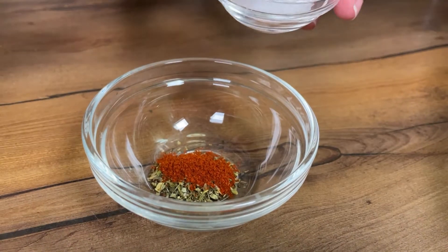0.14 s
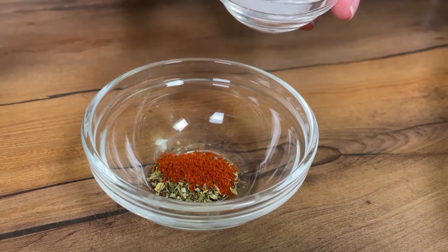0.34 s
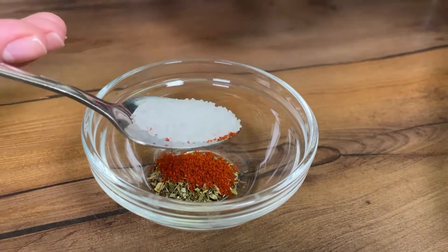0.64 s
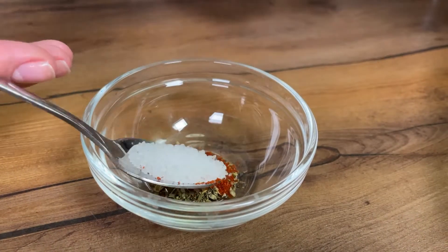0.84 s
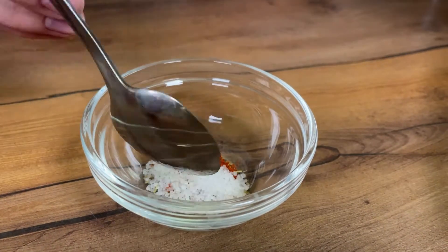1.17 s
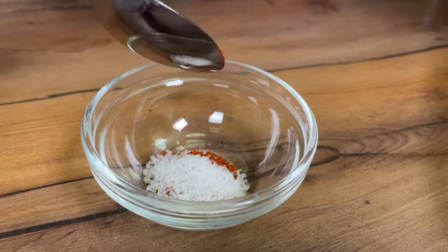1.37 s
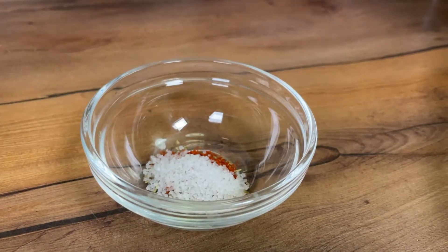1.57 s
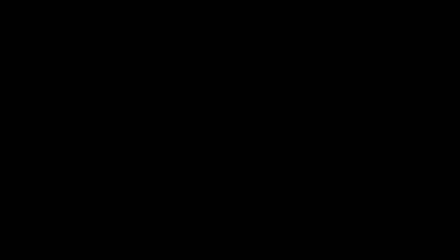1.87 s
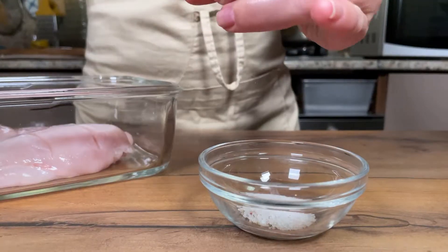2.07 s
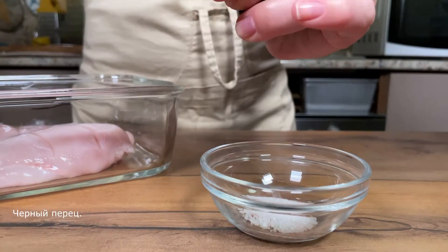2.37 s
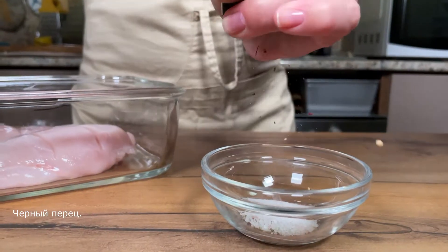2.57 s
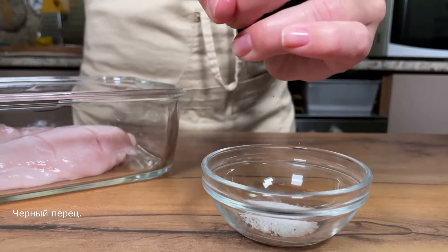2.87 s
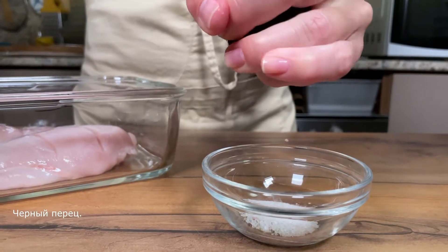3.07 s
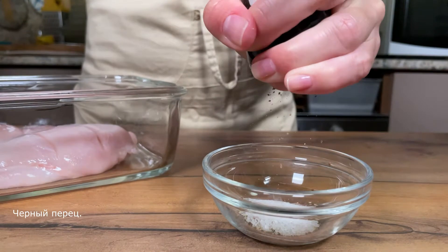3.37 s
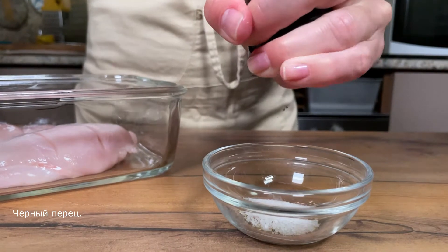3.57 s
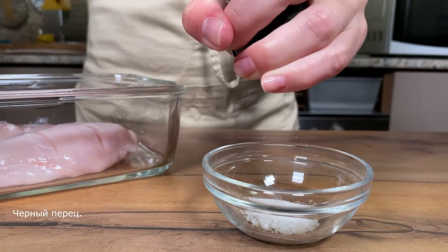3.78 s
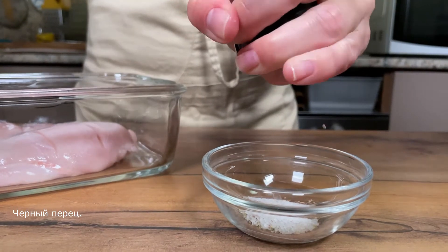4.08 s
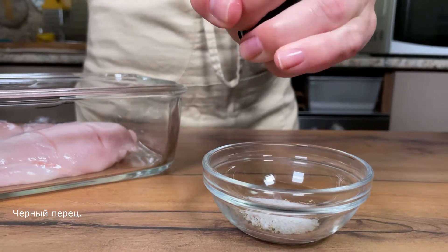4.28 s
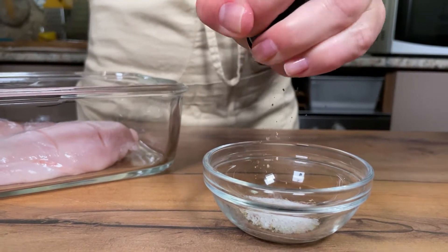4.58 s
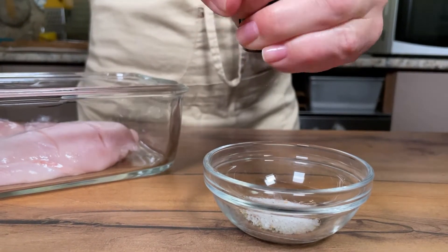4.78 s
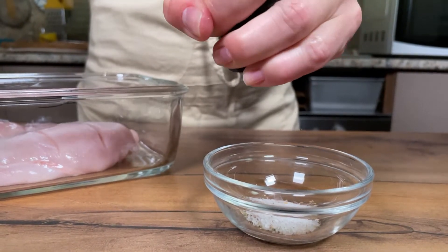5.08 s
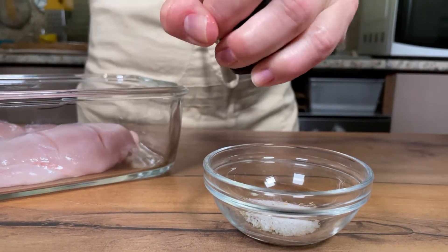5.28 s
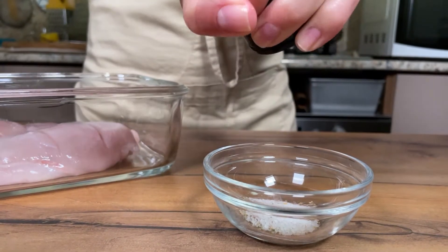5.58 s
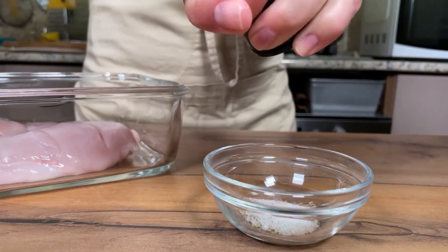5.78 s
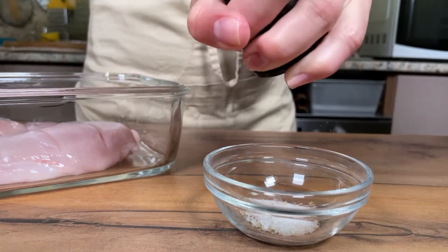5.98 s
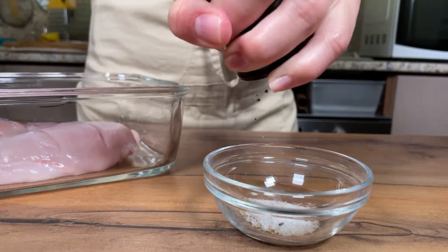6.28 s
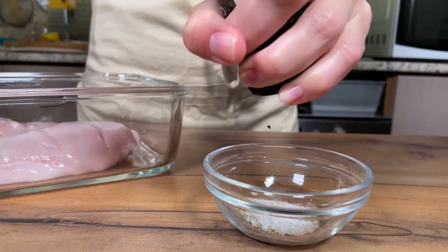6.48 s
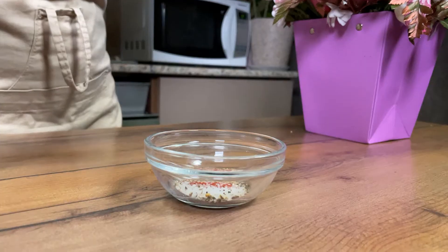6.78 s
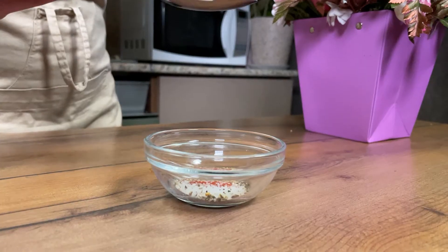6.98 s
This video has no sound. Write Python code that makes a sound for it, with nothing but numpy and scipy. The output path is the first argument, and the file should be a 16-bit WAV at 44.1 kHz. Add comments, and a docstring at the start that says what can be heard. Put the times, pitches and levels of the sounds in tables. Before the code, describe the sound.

A low, soft kitchen rumble with a faint appliance hum opens the scene. At about 0.86 s a spoon touches a small glass bowl with a short bright clink and slight bounce, followed by a duller knock at 0.9 s; coarse salt slides off with a barely audible hiss until about 1.5 s. The sound drops out completely around 1.93-2.0 s. Then a hand pepper mill, close to the microphone, is twisted in runs: 2.4-2.75, 3.04-3.33 (the strongest), 3.7-3.9 and 4.3-4.55 s, each a cluster of dry, sharp cracks with gritty crushing and a short room ring. Faint hand rustles precede the twists. A much weaker turn comes at 4.9-5.2 s, a small knock at 5.4, and tiny crumb ticks on glass at 5.5-5.65. A last crunch at 5.95-6.2 s has a bright crack and ends in a hard knock. After another dropout at 6.55-6.63 s, only rumble and hum remain.

```python
"""A low hum and rumble of a kitchen come first, then a spoon clinks on a small glass bowl and coarse salt hisses out.
Then a hand pepper mill is twisted over the bowl: peppercorns crack in runs, grit is crushed, crumbs tick on the glass.
Breaks and grit are noise bursts and random clicks sent through resonances of the mill; the spoon is ringing sines.
Hands and salt are fine random clicks, coloured. All is heard close to, on one microphone channel;
the hard-walled kitchen rings after mill and bowl, an appliance hums throughout, and the sound drops out briefly twice."""
import sys
import numpy as np
from scipy import signal
from scipy.fft import rfft, irfft, next_fast_len
from scipy.io import wavfile
from scipy.ndimage import uniform_filter1d

SR = 44100
rng = np.random.default_rng(int(sys.argv[2]) if len(sys.argv) > 2 else 0)


def dump_mix(stems):
    """Bounce the given channels to the path in sys.argv[1] as a 16-bit WAV at rate SR."""
    frames = np.atleast_2d(stems).T  # one column per channel
    limited = np.clip(frames, -1, 1)  # hard clip at full scale
    pcm = np.round(limited * 32767).astype(np.int16)
    wavfile.write(sys.argv[1], SR, pcm)


N = 314842
TIME = np.arange(N) / SR

# peppercorns breaking between the burrs: (time [s], crack level [dB], casing knock [dB re crack level])
CRACKS = [(2.381, -11.5, -25.5), (2.386, -8.5, -23.5), (2.394, -8.5, -18), (2.398, -8, -34.5),
          (2.475, -25, -16), (2.495, -20, -21), (2.509, -9, -34), (2.564, -8.5, -29.5), (2.643, -16, -32),
          (2.656, -19.5, -18), (2.747, -38.5, -16), (3.039, -17.5, -26.5), (3.096, -7.5, -26),
          (3.123, -11.5, -24), (3.151, -20.5, -19.5), (3.193, -14.5, -35.5), (3.221, -5.5, -20),
          (3.234, -6, -18.5), (3.279, 0, -25.5), (3.284, -6.5, -22), (3.298, -6, -22.5),
          (3.31, -16.5, -17.5), (3.331, -14, -10.5), (3.686, -10, -33), (3.699, -5, -42.5),
          (3.755, -7, -27), (3.763, -6.5, -22), (3.796, -10, -26.5), (3.838, -17.5, -25.5),
          (3.856, -12, -30), (3.877, -10.5, -41), (4.277, -24.5, -25), (4.305, -23.5, -22.5),
          (4.322, -14, -25), (4.334, -7.5, -23.5), (4.346, -6, -29), (4.363, -12, -25.5),
          (4.381, -11, -26.5), (4.444, -11, -30), (4.461, -8.5, -14.5), (4.484, -12, -24),
          (4.507, -10, -28), (4.545, -30.5, -19.5), (4.905, -31.5, -22), (4.916, -27, -27),
          (4.99, -15, -29), (5.12, -39, -37), (5.176, -25.5, -32.5), (5.952, -29, -16),
          (5.991, -3.5, -23.5), (6.008, -5, -26.5), (6.081, -12.5, -27.5), (6.214, -12.5, -10)]
# the pieces of a broken corn splinter in turn: least gap, and the mean of the random delay on top of it
SPLINTER_WAIT_S, SPLINTER_MEAN_DELAY_S = 0.003, 0.007
# the first is much weaker than the crack, the others fall off steadily, with a random scatter
SPLINTER_FIRST_DB, SPLINTER_LOSS_DB, SPLINTER_SCATTER_DB = -11, 6, 3
SPLINTER_CASING_DB = -25.5   # casing knock re splinter level


def breakages(count):
    """Every corn's crack and the `count` splinters after it: (time [s], level [dB], casing [dB re level])."""
    rows = []
    for s, crack_db, casing_db in CRACKS:
        rows.append((s, crack_db, casing_db))
        gaps = SPLINTER_WAIT_S + SPLINTER_MEAN_DELAY_S * rng.exponential(size=count)
        times = s + np.cumsum(gaps)
        levels = crack_db + SPLINTER_FIRST_DB - SPLINTER_LOSS_DB * np.arange(count)
        levels = levels + SPLINTER_SCATTER_DB * rng.standard_normal(count)
        rows += [(t, db, SPLINTER_CASING_DB) for t, db in zip(times, levels)]
    return rows


# resonances of the burrs, the casing and the sharp edge: (frequency [Hz], width [Hz], gain [dB])
BURR_MODES = [(2840, 940, -14.5), (4200, 900, -8), (5365, 450, -3), (5915, 260, -2), (7810, 690, 0.5),
              (9600, 620, -14)]
CASING_MODES = [(228, 99, -16), (838.6, 410, -2), (1174, 563, 3), (1585, 594, 2.5)]
EDGE_MODES = [(10960, 2200, -4), (13600, 700, -1.5), (14900, 1400, -0.5)]
# each twist is held differently and colours all its breaks:
# (start [s], added gain of the lowest burr mode [dB], mean sharp edge [dB re break level])
TWISTS = [(2.3, 3, -19.5), (3.0, 5.5, -19), (3.6, 0.5, -16.5), (4.2, -5, -20), (4.8, 3, -13.5),
          (5.9, -8, -22.5)]
BURR_DB, EDGE_SCATTER_DB = -12, 6   # burr ring, rms re break level; random spread of the edge


def peppercorns():
    """Each break rings the burrs, knocks the casing and has a sharp edge, coloured by the twist it belongs to."""
    s, level_db, casing_db = np.transpose(breakages(count=4))
    twists = np.array(TWISTS)
    _, lowest_mode_db, edge_db = twists[np.searchsorted(twists[:, 0], s) - 1].T
    breaks = fractures(len(s), snap_s=0.00029, crumble_s=0.002, crumble_db=-9.0)
    # where a corn sits between the teeth decides how hard each burr mode is struck
    shares_db = 3 * rng.standard_normal((len(s), len(BURR_MODES), 1))
    shares_db[:, 0, 0] += lowest_mode_db
    struck = [(hz, width, db + shares_db[:, k]) for k, (hz, width, db) in enumerate(BURR_MODES)]
    edge_db = edge_db + EDGE_SCATTER_DB * rng.standard_normal(len(s))
    burr = at_level(high_pass(resonate(breaks, struck), hz=2360), level_db + BURR_DB)
    casing = at_level(low_pass(resonate(breaks, CASING_MODES), hz=2730), level_db + casing_db)
    edge = at_level(high_pass(resonate(breaks, EDGE_MODES), hz=9000), level_db + edge_db)
    return place(s, burr + casing + edge)


def grit(linger_s, strain_s, strain_db, burr_db, casing_db, edge_db, rumble_db):
    """A corn creaks under strain before it breaks, then its fragments are crushed and the load shudders the mill."""
    s, level_db = np.transpose(CRACKS)[:2]
    energy = place(s, from_db(level_db)[:, None] ** 2)
    # run backwards in time, so that the strain builds up towards each crack
    strain = linger(energy[::-1], strain_s)[::-1]
    load = np.sqrt(linger(energy, linger_s)) + from_db(strain_db) * np.sqrt(strain)
    crush = grains(per_s=940, spread_db=4.5)
    sound = from_db(rumble_db) * rms_one(resonate(crush, [(110, 280, 0)]))   # the shudder
    for modes, db in ((BURR_MODES, burr_db), (CASING_MODES, casing_db), (EDGE_MODES, edge_db)):
        sound = sound + from_db(db) * rms_one(resonate(crush, modes))
    return load * sound


# crumbs landing in the bowl: (time [s], peak level [dB])
CRUMBS = [(4.169, -42), (5.4812, -41.5), (5.5702, -48.5), (5.6027, -36.5), (5.622, -37), (5.6266, -42),
          (5.6374, -43.5)]
# resonances of their ticks: (frequency [Hz], width [Hz], relative gain [dB])
CRUMB_MODES = [(5260, 900, -36.5), (8500, 1900, 22), (10300, 1500, -9), (14700, 6500, -15.5)]


def crumbs():
    """Light crumbs tick on the glass: short noise bursts through broad resonances."""
    s, peak_db = np.transpose(CRUMBS)
    bursts = fractures(len(s), snap_s=0.00012, crumble_s=0.0023, crumble_db=-9)
    ticks = resonate(bursts, CRUMB_MODES)
    heights = from_db(peak_db) / np.abs(ticks).max(axis=1)
    return place(s, ticks * heights[:, None])


# touches of the spoon on the glass: (time [s], level [dB])
CLINKS = [(0.8566, -26.5), (0.8580, -37.5), (0.8708, -37.5)]
# ringing modes of the clink: (frequency [Hz], level [dB re touch], decay t60 [s])
SPOON_MODES = [(2153, -31.5, 0.8), (2134, 0, 0.029), (2230, -11.5, 0.018), (2380, 1.5, 0.017),
               (3300, -20, 0.04), (5230, -29, 0.27), (5140, -3.5, 0.057), (5800, -22, 0.051),
               (8770, -13.5, 0.029), (13800, -19, 0.046)]


def spoon(tick_db):
    """The spoon strikes the glass and bounces; salt caught between them gives each touch a gritty tick."""
    s, db = np.transpose(CLINKS)
    touches = place(s, from_db(db)[:, None])
    rings = sum(from_db(level_db) * ring(touches, hz, t60) for hz, level_db, t60 in SPOON_MODES)
    crushed_salt = fractures(len(s), snap_s=0.00048, crumble_s=0.0017, crumble_db=-6)
    ticks = at_level(resonate(crushed_salt, [(2470, 720, -1.5), (6170, 710, -2)]), db + tick_db)
    return high_pass(rings + place(s, ticks), hz=1610)


# knocks of the utensils and of the mill's body in the hand, and the bright 3.9 kHz ring of the crack at 6.01 s:
# (time [s], pitch [Hz], level [dB], decay t60 [s])
KNOCKS_AND_RING = [(0.857, 587, -46.5, 0.42), (0.8982, 556, -32.5, 0.17), (0.8995, 621, -41, 0.21),
                   (0.898, 327, -42, 0.049), (0.894, 1006, -51, 0.12), (2.387, 95, -36.5, 0.027),
                   (3.227, 86.5, -31, 0.053), (5.411, 500, -43, 0.017), (5.416, 127.6, -46, 0.079),
                   (6.0101, 3930, -12, 0.008), (6.2150, 1145, -5, 0.0051)]


def knocks_and_crack_ring(rough, rattle_hz):
    """Each knock, and the ring of one crack, is a decaying sine with a soft onset, roughened by slow noise."""
    s, hz, db, t60 = np.transpose(KNOCKS_AND_RING)[:, :, None]
    t = np.arange(SR // 2) / SR
    noise = rng.standard_normal((len(s), len(t)))
    rattle = 1 + rough * rms_one(low_pass(noise, hz=rattle_hz))
    build_up = 1 - np.exp(-2 * hz * t)   # time constant of half a cycle
    envelope = t60_decay(t, t60) * build_up
    return place(s.ravel(), from_db(db) * np.sin(2 * np.pi * hz * t) * envelope * rattle)


# salt sliding off the spoon: (time [s], level [dB], brightness [0-1])
SALT = [(0.86, -78, 1), (0.92, -71, 1), (1.05, -72, 0.98), (1.275, -88, 0.02), (1.295, -66, 0),
        (1.34, -65, 0), (1.48, -88, 0)]
# colour of the hiss on the heap and on the steel: (frequency [Hz], width [Hz], relative gain [dB])
SALT_HEAP = [(2780, 690, 13), (4380, 3500, -2)]
SALT_ON_STEEL = [(5600, 980, 3.5), (11020, 330, 7)]


def salt():
    """Crystals, as a stream of random clicks, hiss brightly over the steel and more dully onto the heap."""
    db, bright = in_time(SALT, outside=-np.inf)
    bright = np.clip(bright, 0, 1)
    flow = grains(per_s=2000, spread_db=-0.5)
    on_steel = bright * rms_one(resonate(flow, SALT_ON_STEEL))
    on_heap = (1 - bright) * rms_one(resonate(flow, SALT_HEAP))
    return from_db(db) * (on_steel + on_heap)


# the hand takes a fresh grip before each twist: (time [s], level [dB], swell and fade [s])
GRIPS = [(2.29, -63.5, 0.13), (3.023, -51.5, 0.015), (3.658, -49.5, 0.015), (4.2, -69, .05),
         (4.865, -50.5, 0.011), (5.56, -69, 0.081)]
# spectrum of the rustle: (frequency [Hz], relative level [dB per Hz])
HANDS_COLOUR = [(300, -18.5), (1500, -4.5), (3000, -11.5), (5000, 0.5), (7000, -2), (9000, -3.5),
                (12500, -10), (15000, 1.5)]
# while the mill is in the hands, they never rest entirely
HELD_FROM_S, HELD_TO_S, HELD_DB = 2.0, 6.55, -79


def hands():
    """Skin and loose pepper rustle faintly, swelling and fading with each fresh grip."""
    holding = from_db(HELD_DB) * ((TIME > HELD_FROM_S) & (TIME < HELD_TO_S))
    gripping = sum(from_db(db) * np.exp(-np.abs(TIME - s) / swell_s) for s, db, swell_s in GRIPS)
    rustle = grains(per_s=4000, spread_db=2.5)
    return (holding + gripping) * coloured(rustle, HANDS_COLOUR)


# reverberation of the kitchen: (frequency [Hz], relative level [dB], decay t60 [s])
KITCHEN = [(149, 5, 0.38), (600, -5.5, 0.22), (1460, -7.5, 0.4), (2720, 5.5, 0.35), (4730, -4, 0.41),
           (7600, -8.5, 0.41), (10000, -4.5, 0.35), (11900, -1.5, 0.3), (15500, -6, 0.28)]


def kitchen(x, wet_db, build_s, echo_db, echoes_s, turns_per_s):
    """Early echoes from table and cupboards merge into a dense tail that dies band by band.
    The source turns steadily, throwing its sound along two different sets of paths."""
    t = np.arange(SR * 3 // 4) / SR
    early = rng.standard_normal((2, len(t))) * (rng.random((2, len(t))) < 2500 / SR)
    echoes = from_db(echo_db) * rms_one(early) * np.exp(-t / echoes_s)
    wash = rng.standard_normal((2, len(t))) + echoes
    spectrum, bins = rfft(wash), np.arange(len(t) // 2 + 1) * SR / len(t)
    edges = np.geomspace(60, 20000, 22)
    paths = 0
    for low, high in zip(edges, edges[1:]):
        db, t60 = at_hz(KITCHEN, np.sqrt(low * high))
        band = irfft(spectrum * ((bins >= low) & (bins < high)), len(t))
        tail = band * t60_decay(t, t60) * (1 - np.exp(-t / build_s))
        # a wider band carries more of the energy
        paths = paths + from_db(db) * rms_one(tail) * np.sqrt(2 * (high - low) / SR / len(t))
    angle = 2 * np.pi * turns_per_s * TIME
    thrown = x * np.array([np.cos(angle), np.sin(angle)])
    return from_db(wet_db) * signal.fftconvolve(thrown, paths, axes=1).sum(axis=0)[:N]


# spectrum of the kitchen's rumble: (frequency [Hz], relative level [dB per Hz])
AIR = [(20, -26), (60, -0.5), (100, -4.5), (140, -6.5), (230, -2.5), (330, -12.5), (450, -15.5),
       (1000, -21), (2300, -24.5), (5000, -29.5), (8000, -35), (16000, -41)]
# hum of the appliance: (frequency [Hz], rms level [dB])
HUM = [(59.2, -80), (134.6, -72.5), (258.4, -79.5)]


def background(air_db):
    """Low rumble, as coloured noise, and the steady sines of an appliance's hum."""
    hum = 0
    for hz, db in HUM:
        hum = hum + from_db(db) * np.sqrt(2) * np.sin(2 * np.pi * (hz * TIME + rng.random()))
    return from_db(air_db) * coloured(rng.standard_normal(N), AIR) + hum


def fractures(count, snap_s, crumble_s, crumble_db):
    """One row per break: a snap of uneven micro-cracks that swells in an instant, then a weaker crumbling."""
    t = np.arange(SR // 64) / SR
    length = np.exp(0.3 * rng.standard_normal((count, 1)))
    snap = np.exp(-t / (snap_s * length))
    crumbling = from_db(crumble_db) * np.exp(-t / (crumble_s * length))
    swell = 1 - np.exp(-2 * t / snap_s)
    return rng.laplace(size=(count, len(t))) * (snap + crumbling) * swell


def grains(per_s, spread_db):
    """Random clicks of uneven size and either sign; rms 1."""
    sizes = from_db(spread_db * np.minimum(rng.exponential(1, N), 4)) * rng.choice([-1, 1], N)
    return rms_one(sizes * (rng.random(N) < per_s / SR))


def resonate(x, modes):
    """Parallel resonances with alternating signs."""
    out = 0
    for k, (hz, width, db) in enumerate(modes):
        r = np.exp(-np.pi * width / SR)
        poles = [1, -2 * r * np.cos(2 * np.pi * hz / SR), r * r]
        band = (1 - r * r) / 2 * signal.lfilter([1, 0, -1], poles, x + 1e-18)
        out = out + (-1) ** k * from_db(db) * band
    return out


def ring(clicks, hz, t60):
    """A unit click sets a decaying sine of height 1 ringing."""
    r, w = t60_decay(1 / SR, t60), 2 * np.pi * hz / SR
    return signal.lfilter([0, np.sin(w)], [1, -2 * r * np.cos(w), r * r], clicks + 1e-18)


def t60_decay(t, t60):
    """Exponential decay that falls by 60 dB in t60 seconds."""
    return np.exp(-np.log(1000) * t / t60)


def linger(x, seconds):
    """Lets each impulse die away exponentially."""
    return signal.lfilter([1], [1, -np.exp(-1 / (seconds * SR))], x + 1e-18)


def coloured(x, spectrum):
    """Gives a steady noise a spectrum; rms 1."""
    size = next_fast_len(N)
    db, = at_hz(spectrum, np.arange(size // 2 + 1) * SR / size)
    return rms_one(irfft(rfft(x, size) * from_db(db), size)[:N])


def high_pass(x, hz):
    """Removes what lies below `hz`, gently."""
    return signal.sosfilt(signal.butter(2, hz, "high", fs=SR, output="sos"), x)


def low_pass(x, hz):
    """Removes what lies above `hz`, gently."""
    return signal.sosfilt(signal.butter(2, hz, "low", fs=SR, output="sos"), x)


def from_db(db):
    """Decibels to amplitude."""
    return 10 ** (np.asarray(db) / 20)


def rms_one(x):
    """Scales each row to rms 1."""
    return x / np.sqrt(np.mean(x ** 2, axis=-1, keepdims=True) + 1e-20)


def at_level(sounds, db):
    """Scales each row to an rms level over its first 2.5 ms."""
    head = sounds[:, :SR // 400]
    return sounds * (from_db(db) / np.sqrt(np.mean(head ** 2, axis=1)))[:, None]


def place(times, sounds):
    """Lays one short sound at each time."""
    out = np.zeros(N + sounds.shape[1])
    for s, sound in zip(times, sounds):
        start = round(s * SR)
        out[start:start + len(sound)] += sound
    return out[:N]


def in_time(rows, outside):
    """Joins the rows by straight lines; each column rests at `outside` before and after them."""
    s, *columns = np.transpose(rows)
    return [np.interp(TIME, s, c, left=outside, right=outside) for c in columns]


def at_hz(rows, hz):
    """Joins the rows by straight lines over log frequency."""
    points, *columns = np.transpose(rows)
    return [np.interp(np.log(np.maximum(hz, 1)), np.log(points), c) for c in columns]


def scene():
    """Mill and bowl close to, the kitchen ringing after them, and the faint sounds without reverberation."""
    crushing = grit(linger_s=0.014, strain_s=0.00093, strain_db=2.5,
                    burr_db=-28.5, casing_db=-42.5, edge_db=-34.0, rumble_db=-50)
    mill = peppercorns() + crushing
    # the spoon, the crumbs and the knocks, with the ring of one crack among them
    bowl = spoon(tick_db=-7.5) + knocks_and_crack_ring(rough=0.35, rattle_hz=149) + crumbs()
    room = kitchen(mill + from_db(-4.5) * bowl, wet_db=-4.0, build_s=0.0044,
                   echo_db=5.0, echoes_s=0.037, turns_per_s=1.7)
    return (mill + bowl + room + hands() + salt() + background(air_db=-65.5))[None, :]


# brief drop-outs of the whole sound: (start [s], end [s])
SILENCES = [(1.932, 2.007), (6.550, 6.633)]
PEAK_TOP, CUTOFF_HZ = 0.62, 15900   # height below which peaks are rounded off; top of the treble


def record(dry):
    """The sharpest peaks are rounded, the sound drops out briefly twice, and the top is cut."""
    live = np.ones(N)
    for start, end in SILENCES:
        live[(TIME > start) & (TIME < end)] = 0
    rounded = PEAK_TOP * np.tanh(dry / PEAK_TOP)
    interrupted = rounded * uniform_filter1d(live, size=64)   # softens the edges of the drop-outs
    return signal.sosfilt(signal.ellip(12, 0.1, 80, CUTOFF_HZ, fs=SR, output="sos"), interrupted)


dry = scene()
out = record(dry)
dump_mix(out)
```